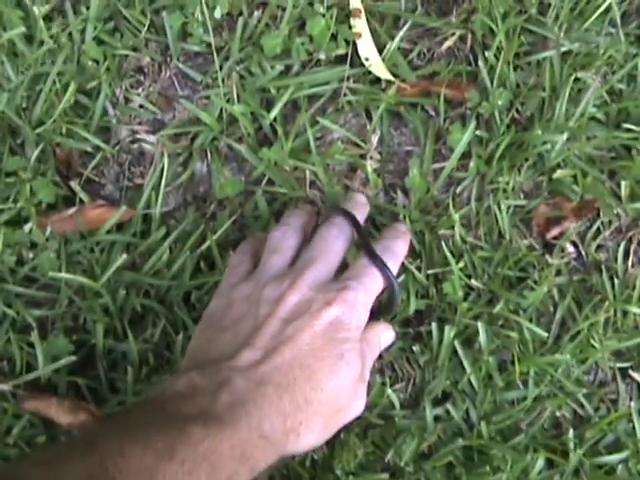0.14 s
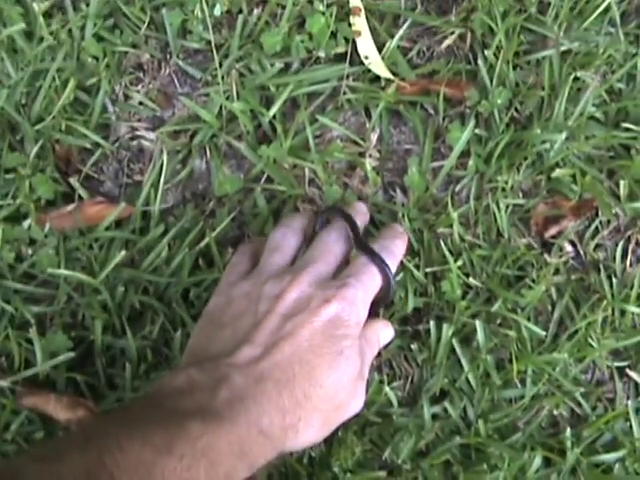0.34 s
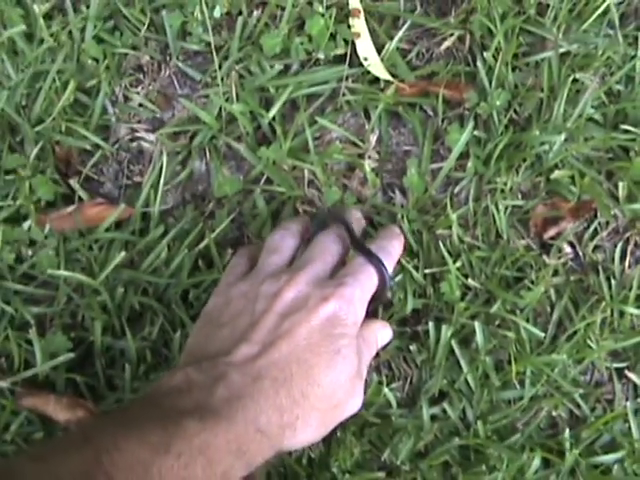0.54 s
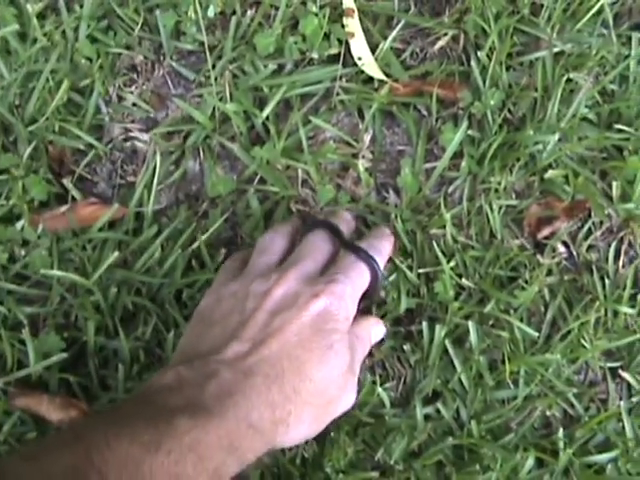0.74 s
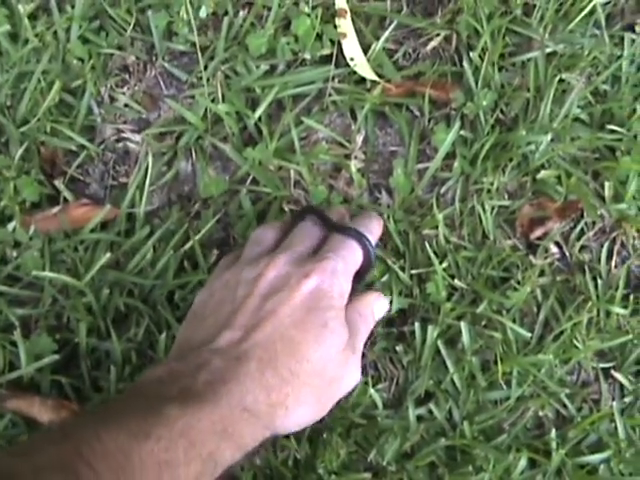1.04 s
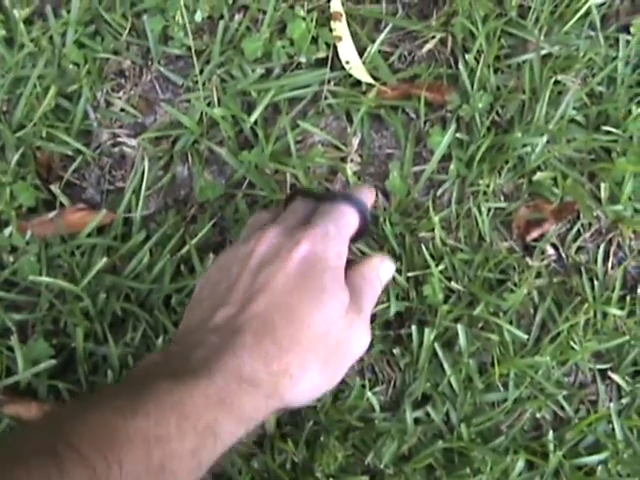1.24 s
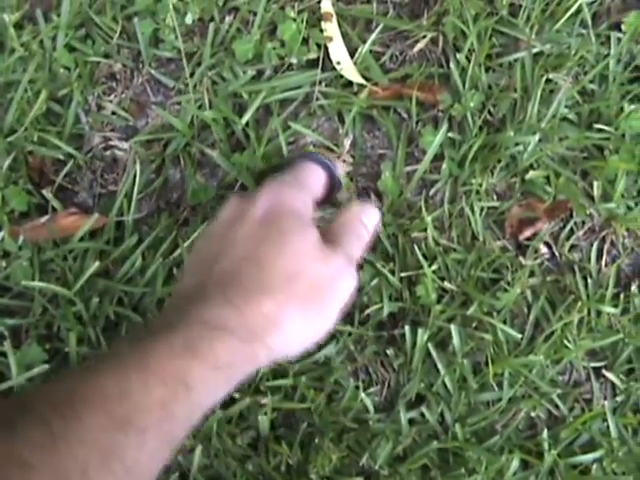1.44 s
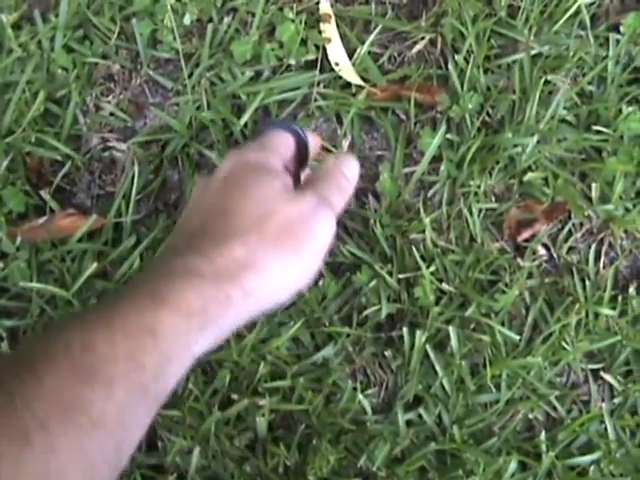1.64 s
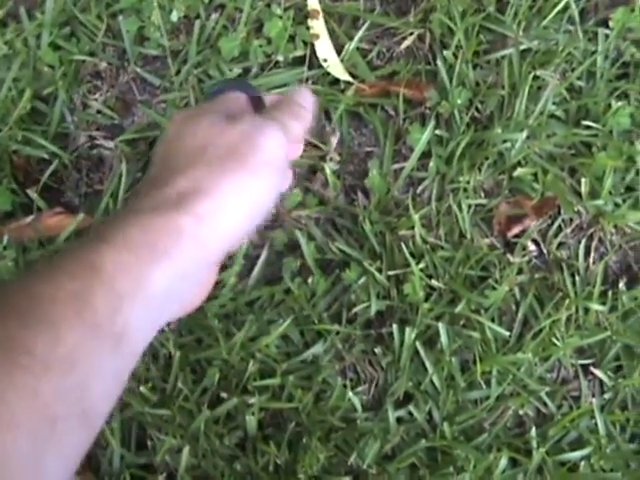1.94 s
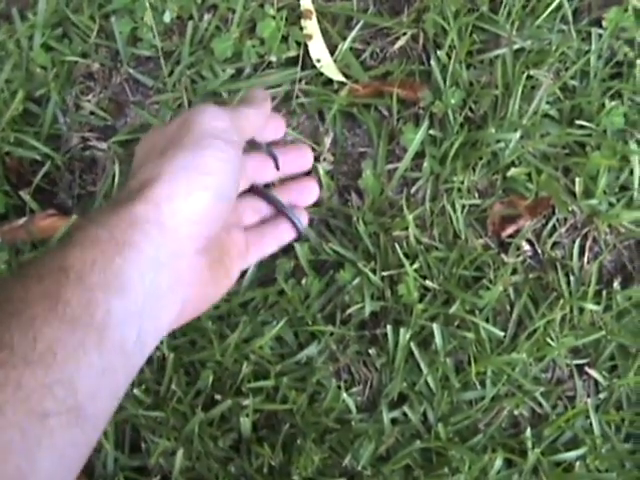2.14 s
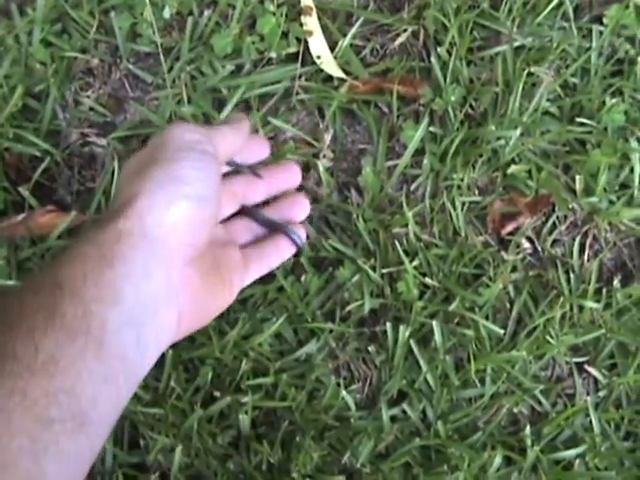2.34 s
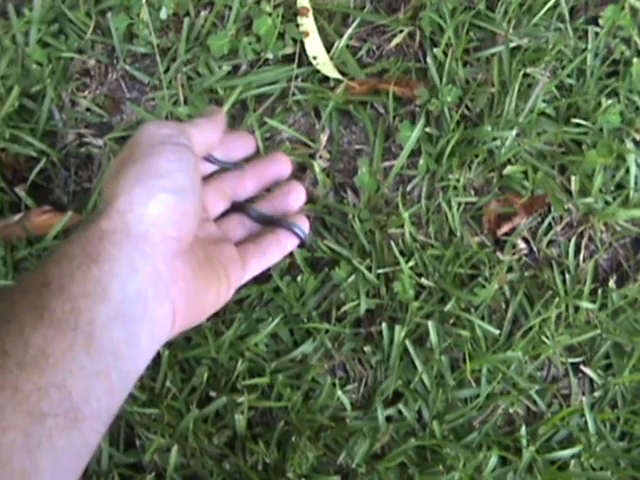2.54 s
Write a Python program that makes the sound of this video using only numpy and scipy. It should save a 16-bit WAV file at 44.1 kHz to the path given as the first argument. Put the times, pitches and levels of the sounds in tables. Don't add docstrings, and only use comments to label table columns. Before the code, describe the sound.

A close cricket trills throughout in quick, shrill pulsing groups over a lawn, while farther crickets drone and lower insects buzz in brief bursts; a handheld camera microphone adds an early tick and faint motor whine.

```python
import sys
import numpy as np
from scipy import signal
from scipy.io import wavfile
from scipy.ndimage import uniform_filter1d

SR = 44100
rng = np.random.default_rng(int(sys.argv[2]) if len(sys.argv) > 2 else 0)


def to_wav(s):
    ch = np.atleast_2d(s).T
    pcm = np.round(np.clip(ch, -1, 1) * 32767)
    wavfile.write(sys.argv[1], SR, pcm.astype(np.int16))


def undo_db(level):
    steps = np.asarray(level, float) / 20
    return 10 ** steps


N = 119070

# (frequency [Hz], width [Hz], level [dB])
TRAFFIC_DRONES = [(55, 6.4, -60), (136.1, 21.7, -56)]
# (frequency [Hz], level [dB])
AIR_TONE = [(28, -36), (42, -18.5), (54, 2), (70, -8), (135, -1.5), (300, -16.5), (1090, -17), (3000, -27)]
# (frequency [Hz], level [dB])
HAZE_TONE = [(2400, -38), (3000, -3), (5300, -14), (6700, -2.5), (7600, 15), (8700, 1), (9500, -17.5),
             (11000, -18)]
# (frequency [Hz], level [dB])
SHEEN_TONE = [(12500, -42), (14300, -18), (15100, -18), (15700, -5)]
# (frequency [Hz], level [dB])
HISS_SPECTRUM = [(9300, -30), (9700, -3), (10700, -3.5), (11500, 4.5), (14000, -0.5), (15700, -4)]
# (time [s], level [dB])
HISS_SWELLS = [(0, -67.5), (1.5, -68), (1.65, -59.5), (2.1, -61), (2.2, -56.5), (2.7, -58.5)]
# (frequency [Hz], correlation [-1 to 1])
STEREO_LIKENESS = [(50, 1), (150, 0.99), (290, 0.5), (640, 0.11), (1410, -0.23), (3100, 0.35), (7600, .9),
                   (15000, -0.17)]
# (frequency [Hz], left minus right [dB])
STEREO_LEAN = [(60, 2.5), (240, 2), (950, 1.5), (3770, 0), (15000, -2)]
# (time [s], level [dB])
WHINE_SWELLS = [(0, -61), (.2, -66.5), (.8, -67), (1.05, -57.5), (1.3, -72.5), (2.7, -66)]
# (time [s], level [dB])
CHORUS_SWELLS = [(0, -59), (.7, -60), (1, -57), (1.35, -54), (1.5, -58), (1.9, -57.5), (2.1, -53),
                 (2.25, -58), (2.7, -55)]
# (note [Hz], stroke rate [1/s], pitch fall [Hz], level [dB], pan [dB])
FAR_CRICKETS = [(8660, 65.6, 170, -55.5, -11), (7290, 56, 520, -45, -3), (7620, 72, 250, -56.5, -6),
                (6230, 62, 340, -68, 1.5)]
# (start [s], length [s], level [dB], pitch [Hz])
HIGH_BURSTS = [
    (.205, 0.087, -51, 4340),
    (1.085, .09, -50, 4430),
    (1.34, 0.075, -53.5, 4430),
    (2.044, .09, -49.5, 4460),
    (2.312, 0.082, -48, 4450),
]
# (start [s], length [s], level [dB], pitch [Hz])
LOW_BURSTS = [
    (.21, 0.056, -56, 3720),
    (.344, 0.031, -48, 3880),
    (.77, .05, -56, 4020),
    (.925, 0.079, -55, 3800),
    (1.23, 0.12, -59, 3970),
    (1.583, 0.066, -52.5, 3880),
    (1.955, 0.13, -55, 3860),
    (2.318, 0.076, -54.5, 3780),
    (2.62, 0.088, -58.5, 3780),
]
# (time [s], peak level [dB], opposite-phase share [ratio])
HOUSING_TICKS = [
    (.2347, -23, 1.3),
    (.9175, -35, .2),
    (1.3175, -36, .2),
    (1.475, -46, .2),
]
# (frequency [Hz], level [dB], T60 [s])
TICK_RINGS = [
    [(830, -7, .03), (1020, -8, .03), (1390, -6, .022), (1750, -3, .02), (2150, -4, .018), (2550, -4, .015),
     (3600, -5, .012), (4600, -10, .008), (5700, -6, .012), (6400, -10, .01), (11500, -24, .008)],
    [(2250, -5, .015), (3600, -8, .01), (5000, -2, .012), (5700, 0, .012)],
    [(260, -2, .05), (420, -3, .04), (700, -4, .025), (2150, -2, .04), (2500, -3, .03), (3600, -12, .01)],
    [(740, 0, .12), (2100, -6, .08)],
]
# (first stroke's peak [s], length [s], level [dB])
STROKE_GROUPS = [(0.004, 0.029, 0.5), (0.051, 0.058, -1.5), (0.128, 0.073, -1.0), (0.2285, 0.102, -1.5),
                 (0.3537, 0.088, -1.5), (0.46, 0.088, -1.0), (0.5673, 0.058, -0.5), (0.6474, 0.088, -0.5),
                 (0.7584, 0.073, -1.5), (0.851, 0.073, 0.0), (0.939, 0.058, -1.5), (1.019, 0.073, 1.5),
                 (1.108, 0.058, 1), (1.185, 0.073, 0.0), (1.2737, 0.058, 1.0), (1.3528, 0.073, -0.5),
                 (1.4395, 0.075, 0.0), (1.536, 0.078, 0.81), (1.6255, 0.075, 0.0), (1.7165, 0.08, 0.0),
               (1.811, 0.089, 0.0), (1.918, 0.071, 0.0), (2.0035, 0.045, 1.0), (2.077, 0.07, 0.58),
               (2.174, 0.11, 0.73), (2.302, 0.085, 0.9), (2.409, 0.076, 1.0), (2.4925, 0.023, 1),
               (2.5505, 0.043, 0.95), (2.622, 0.055, 1.0), (2.696, 0.011, 0.62)]
# (time from peak [ms], pitch above the wing note [Hz], level [dB])
WING_STROKE = [(-6.2, 330, -26), (-5.3, 260, -7), (-3, 90, -6), (0, 0, 0), (2.6, -70, -3), (3.5, -300, -11),
               (5.2, -400, -3), (7.5, -420, -4), (9, -410, -24)]
# (time [s], wing note [Hz], share of the closing pitch fall [0-1])
WING_DRIFT = [(0, 7695, 1), (1, 7680, .95), (1.5, 7650, .6), (2, 7625, .4), (2.7, 7615, .4)]
# (delay [ms], left level [dB], right level [dB])
GROUND_BOUNCES = [
    (1.3, -16, -12),
    (3.1, -15, -17),
    (6.2, -14, -12),
]


def evened(x):
    return x / np.sqrt(np.mean(x ** 2) + 1e-20)


def slow_drift(size):
    return evened(uniform_filter1d(rng.standard_normal(N), size=size))


def curve(points, col=1):
    p = np.array(points, float)
    return np.interp(np.arange(N) / SR, p[:, 0], p[:, col])


def read(points, hz):
    f, value = np.transpose(points)
    return np.interp(np.log(hz + 1), np.log(f + 1), value, -90, -90)


def add(mix, s, sound):
    at = round(s * SR)
    part = mix[..., max(at, 0):][..., :sound.shape[-1] + min(at, 0)]
    part += sound[..., max(-at, 0):][..., :part.shape[-1]]


def resonate(x, hz, width):
    turn = np.exp(2j * np.pi * hz * np.arange(x.shape[-1]) / SR)
    r = np.exp(-np.pi * width / SR)
    ringing = signal.lfilter([(1 - r) ** 2], [1, -2 * r, r * r], x / turn)
    return 2 * (turn * ringing).real


def panned(x, pan_db):
    return x * undo_db(np.array([[pan_db / 2], [-pan_db / 2]]))


def noise(tone, patchy_db):
    frames, hz = N // 256 + 5, np.fft.rfftfreq(1024, 1 / SR)
    a, b, c, d, patches = rng.standard_normal((frames, 513, 5)).T
    patches = uniform_filter1d(patches, size=10, axis=0)
    patches = evened(uniform_filter1d(patches, size=10, axis=1))
    same = np.clip(np.interp(hz, *np.transpose(STEREO_LIKENESS)), -1, 1)[:, None]
    tilt = undo_db(np.interp(hz, *np.transpose(STEREO_LEAN)) / 2)[:, None]
    left = a + 1j * b
    right = same * left + np.sqrt(1 - same ** 2) * (c + 1j * d)
    z = np.array([left * tilt, right / tilt])
    z *= undo_db(read(tone, hz)[:, None] + patchy_db * patches)
    return evened(signal.istft(z, nperseg=1024, noverlap=768)[1][:, :N])


def lawn(x, t60):
    turns_per_s = 6.3
    t, out = np.arange(SR // 5) / SR, np.zeros((2, N))
    for k in range(3):
        signs = rng.choice([-1., 1.], (2, len(t)))
        taps = signs * (rng.random((2, len(t))) < .05) * undo_db(-60 * t / t60)
        share = np.sqrt(2 / 3) * np.cos(np.pi * (np.arange(N) / SR * turns_per_s + k / 3))
        tail = taps / np.linalg.norm(taps[0])
        out += signal.oaconvolve((x * share)[None], tail, axes=1)[:, :N]
    return out


def traffic():
    hum = np.zeros(N)
    for hz, width, db in TRAFFIC_DRONES:
        hum += undo_db(db) * evened(resonate(rng.standard_normal(N), hz, width))
    return panned(hum, 2.1)


def open_air():
    return undo_db(-46.5) * noise(AIR_TONE, 0.6)


def insect_haze():
    return undo_db(-39.5) * noise(HAZE_TONE, 1.5)


def high_hiss():
    flicker_db = 2.5 * slow_drift(1500)
    hiss = undo_db(curve(HISS_SWELLS) + flicker_db) * noise(HISS_SPECTRUM, 0.49)
    return hiss + undo_db(-65) * noise(SHEEN_TONE, 1.2)


def motor_whine():
    drift = slow_drift(9000)
    turn = 2 * np.pi * np.cumsum(1095 + 5 * drift) / SR
    return undo_db(curve(WHINE_SWELLS) + 0.36 * drift) * np.sin(turn)


def chorus():
    hz, width_hz, clicks_per_s, trim_db = 3643, 1090, 750, 5
    strength = undo_db(0.39 * np.minimum(rng.exponential(1, N), 4))
    clicks = strength * (rng.random(N) < clicks_per_s / SR) * rng.choice([-1, 1], N)
    band = resonate(resonate(clicks, hz, width_hz), hz, 2 * width_hz)
    return undo_db(curve(CHORUS_SWELLS) + trim_db) * evened(band + 0.56 * lawn(band, 0.23))


def far_crickets():
    out = np.zeros((2, N))
    for hz, per_s, fall_hz, db, pan_db in FAR_CRICKETS:
        drift = slow_drift(4000)
        u = np.cumsum(per_s * (1 + .06 * drift)) / SR % 1
        pitch = hz * (1 + .004 * drift) + fall_hz * (.5 - u)
        tone = np.sin(2 * np.pi * np.cumsum(pitch) / SR)
        trill = np.sin(np.pi * u) ** 2 * tone * undo_db(2.5 * drift)
        out += undo_db(db) * evened(panned(trill, pan_db) + .9 * lawn(trill, .2))
    return out


def buzzes(table, trim_db):
    clicks_per_s, width_hz, rough, hold, sag = 139.1, 850, .42, .32, .04
    out = np.zeros(N)
    for start, length, db, hz in table:
        t = np.arange(0, min(length, .24), 1 / SR)
        since = t % (1 / clicks_per_s)
        gate = np.exp(-since * clicks_per_s / hold)
        pitch = hz * (1 + sag * (.5 - t / length))
        drive = gate * (np.sin(2 * np.pi * pitch * since) + 4 * rough * rng.standard_normal(len(t)))
        burst = evened(resonate(drive, hz, width_hz)) * signal.windows.tukey(len(t), .55)
        add(out, start, undo_db(db + trim_db) * burst)
    return out + .9 * lawn(out, .15)


def hand_rub():
    start_s, length_s, level_db, from_hz, to_hz = 2.385, .12, -51, 340, 600
    t, out = np.arange(0, length_s, 1 / SR), np.zeros(N)
    hz = from_hz + (to_hz - from_hz) * t / length_s
    grain = evened(1 + 8 * uniform_filter1d(rng.standard_normal(len(t)), size=200))
    rub = np.hanning(len(t)) * grain * np.sin(2 * np.pi * np.cumsum(hz) / SR)
    add(out, start_s, undo_db(level_db) * rub)
    return out


def ring(modes, detune, t):
    out = np.zeros(len(t))
    for hz, db, t60 in modes:
        out += undo_db(db - 60 * t / t60) * np.sin(2 * np.pi * (hz * detune * t + rng.random()))
    return out * np.minimum(t / .0005, 1) / abs(out).max()


def ticks():
    snap_db, snap_t60, snap_hz = -3, .016, (1500, 4000)
    rebound_s, rebound_db = .003, -7
    out, t = np.zeros((2, N)), np.arange(2500) / SR
    band = signal.butter(3, snap_hz, "band", fs=SR, output="sos")
    for (s, db, opposite), modes in zip(HOUSING_TICKS, TICK_RINGS):
        mid, side = ring(modes, 1, t), ring(modes, .97, t)
        knock = np.array([mid + opposite * side, mid - opposite * side])
        if len(modes) > 6:
            knock += signal.sosfilt(band, rng.standard_normal(len(t))) * undo_db(snap_db - 60 * t / snap_t60)
        knock *= undo_db(db)
        add(out, s, knock)
        add(out, s + rebound_s, undo_db(rebound_db) * knock)
    return out


def wing_strokes():
    stroke_s, octave_db, wobble = .0146, -46, .0015
    first_db, uneven_db = -2, 0.93
    ms, above_hz, db = np.transpose(WING_STROKE)
    t = np.arange(ms[0], ms[-1], 1000 / SR)
    above, shape = np.interp(t, ms, above_hz), undo_db(np.interp(t, ms, db))
    note, fall, wing = curve(WING_DRIFT), curve(WING_DRIFT, col=2), np.zeros(N)
    for start, length, level_db in STROKE_GROUPS:
        for k in range(round(length / stroke_s)):
            late, detune, uneven, phase = rng.standard_normal(4)
            s = start + k * stroke_s + .00002 * late
            at = min(round(s * SR), N - 1)
            bend = np.where(above < 0, above * fall[at], above)
            hz = note[at] * (1 + wobble * detune) + bend
            turn = 2 * np.pi * np.cumsum(hz) / SR + .7 * phase
            tone = np.sin(turn) + undo_db(octave_db) * np.sin(2 * turn)
            gain = undo_db(level_db + first_db * (k == 0) + uneven_db * uneven)
            add(wing, s + ms[0] / 1000, gain * shape * tone)
    return wing


def cricket():
    wing = wing_strokes()
    out = panned(wing, -1.3) + undo_db(-13) * lawn(wing, .08)
    for delay_ms, left_db, right_db in GROUND_BOUNCES:
        add(out, delay_ms / 1000, wing * undo_db(np.array([[left_db], [right_db]])))
    return undo_db(-34) * evened(out)


def scene():
    background = traffic() + open_air() + insect_haze() + high_hiss()
    insects = chorus() + far_crickets() + buzzes(HIGH_BURSTS, -.5) + buzzes(LOW_BURSTS, 1.2)
    camera = motor_whine() + hand_rub() + ticks()
    return background + insects + camera + cricket()


def band_limit(x):
    return signal.sosfilt(signal.butter(12, 17080, fs=SR, output="sos"), x)


def record(dry):
    low_cut = signal.butter(4, 40, "high", fs=SR, output="sos")
    edge = signal.firwin(511, 15750, window=("kaiser", 9), fs=SR)
    mix = signal.oaconvolve(signal.sosfilt(low_cut, dry), edge[None], "same")
    return band_limit(mix)


dry = scene()
out = record(dry)
to_wav(out)
```